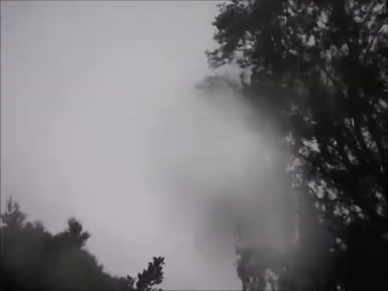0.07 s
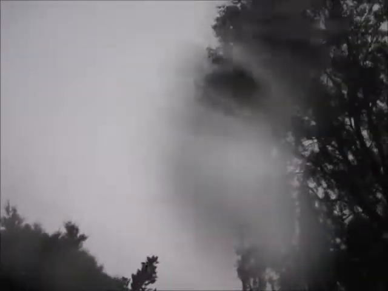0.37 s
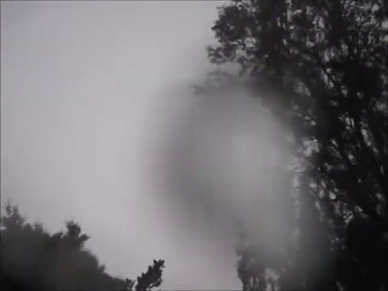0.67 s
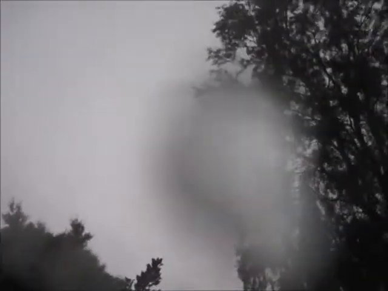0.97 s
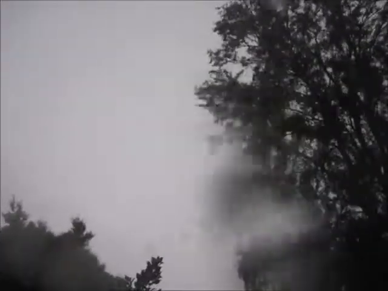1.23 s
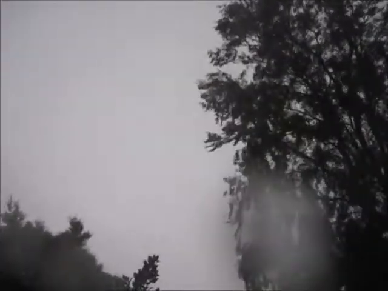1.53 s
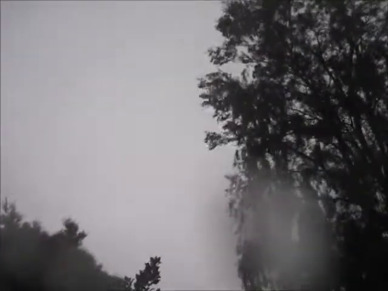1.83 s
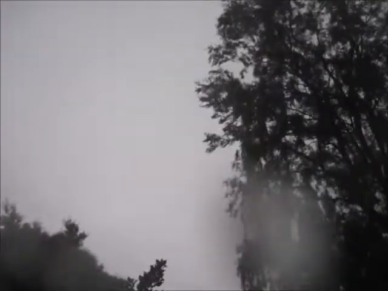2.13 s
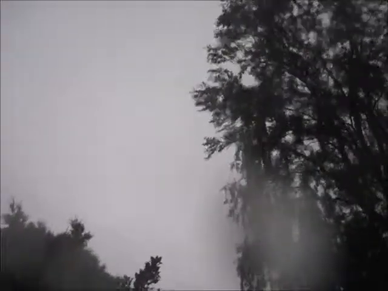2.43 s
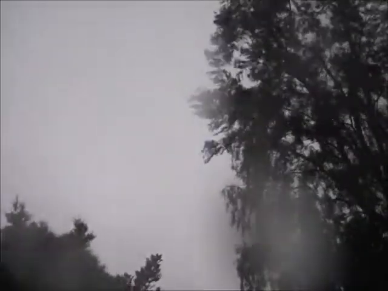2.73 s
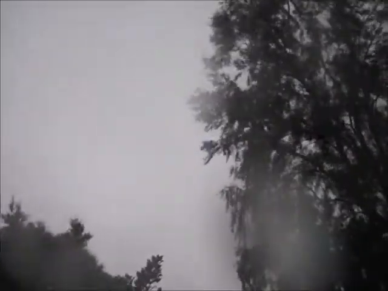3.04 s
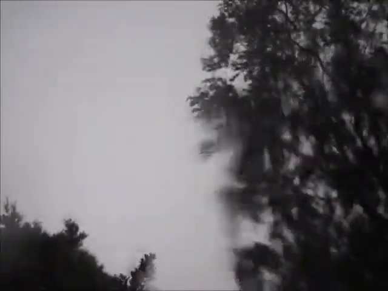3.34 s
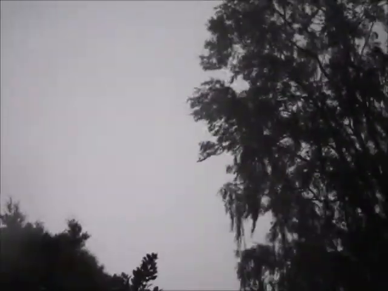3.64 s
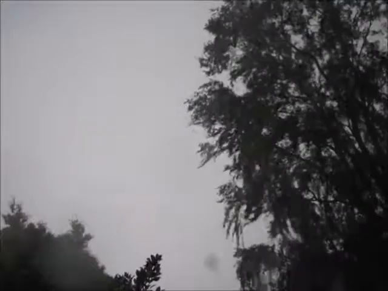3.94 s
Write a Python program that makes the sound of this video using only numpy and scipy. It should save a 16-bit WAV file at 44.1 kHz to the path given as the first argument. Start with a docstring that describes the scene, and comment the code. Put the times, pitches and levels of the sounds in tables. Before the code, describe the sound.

Heavy raindrops smack and tap right beside the microphone over a steady wash of rain.

```python
"""Heavy raindrops smack onto a camera held out in the rain, right beside its microphone.
Each drop is a splat, about a millisecond long, that makes the casing ring. Drops on wet spots plop,
and drops further off on the body give hollow knocks. Light taps and fine spray patter between them
over the steady wash of rain on trees. The hardest hits overload the microphone."""
import sys
import numpy as np
from scipy import signal
from scipy.fft import rfft, irfft
from scipy.io import wavfile
from scipy.ndimage import uniform_filter1d

SR = 44100
rng = np.random.default_rng(int(sys.argv[2]) if len(sys.argv) > 2 else 0)


def int16_out(signal):
    """Quantize to a 16-bit WAV file."""
    q = np.round(np.clip(np.atleast_2d(signal).T, -1, 1) * 32767)
    wavfile.write(sys.argv[1], SR, q.astype(np.int16))


N = 176400  # 4 seconds
HIT_TIME = np.arange(6000) / SR  # seconds since a drop landed

# big drops, with four parts from low to high (time [s], thud [dB], smack [dB], crack [dB], spray [dB])
HEAVY_DROPS = [(0.023, -33, -16.5, -23, -21.5), (0.0539, -32, -21.5, -27, -23.5),
               (0.2035, -21, -16.5, -19.5, -27), (0.2249, -38, -17, -18.5, -24),
               (0.2619, -37, -18.5, -19.5, -23), (0.2683, -28.5, -19.5, -21.5, -20),
               (0.3103, -49, -17, -42, -28), (0.327, -29, -27, -23.5, -34),
               (0.3453, -35, -25.5, -25.5, -29), (0.3607, -30, -39, -23, -28.5),
               (0.3913, -29.5, -17, -24.5, -28), (0.4087, -30, -45, -23.5, -26),
               (0.4378, -32.5, -34, -21.5, -26.5), (0.4776, -32.5, -19, -23, -34),
               (0.5055, -38, -24, -23, -30), (0.5205, -34, -24, -25, -51.0),
               (0.5502, -29, -32, -24.5, -27.5), (0.6153, -32.5, -19.5, -21, -22),
               (0.711, -38, -23, -26, -29), (0.845, -20.5, -13.5, -15, -18),
               (0.8814, -24.5, -15, -20, -19.5), (1.0153, -22.5, -12, -23, -15),
               (1.053, -30, -22, -19, -29), (1.091, -19.5, -14.5, -22.5, -23),
               (1.1364, -19, -21.0, -17.5, -20), (1.1409, -29.5, -35, -27, -35),
               (1.1666, -28.5, -28.5, -33, -35), (1.2401, -22, -24.5, -18.5, -25),
               (1.2776, -34, -17.5, -23.5, -29), (1.2853, -24, -18, -18, -13),
               (1.3581, -25, -12, -15.5, -18.5), (1.369, -33.5, -19, -43, -36),
               (1.6028, -29.5, -19.5, -20, -27), (1.6329, -35.0, -27.5, -31, -36),
               (1.6604, -29.5, -28, -28.5, -33), (1.719, -27, -16.5, -24.5, -23),
               (1.7907, -29, -26.5, -19, -21.5), (2.0823, -38.0, -29, -35.5, -27.5),
               (2.1791, -22.5, -16, -19, -25), (2.3568, -37, -24.5, -24, -26.5),
               (2.536, -23, -19.5, -23, -36), (2.5722, -37, -19, -27, -30), (2.6375, -21, -22.5, -43, -37),
               (2.7714, -44, -28, -27.5, -56), (2.8062, -45, -21, -31, -31), (2.8225, -29.5, -21, -38, -31),
               (2.8612, -46, -20.5, -28, -36), (3.0204, -33, -22.5, -24, -33),
               (3.1273, -13.5, -15.5, -17, -18), (3.1804, -17.5, -16.5, -22, -23.5),
               (3.2398, -20, -21, -28.0, -32), (3.2585, -22, -12, -18.5, -21),
               (3.2903, -20, -21.5, -24, -21.5), (3.3188, -37, -22, -24.5, -27),
               (3.3293, -28, -31, -31, -34), (3.3468, -27.5, -20, -21, -17.5),
               (3.4164, -19, -19.5, -19.5, -24.5), (3.579, -18, -26, -21, -26),
               (3.6373, -25.5, -13, -22.5, -21.5), (3.6456, -29, -22, -19.5, -25),
               (3.657, -28.5, -14.5, -28, -23), (3.68, -30, -14, -25, -36), (3.884, -17, -21.5, -18, -24),
               (3.916, -23, -14.5, -17.5, -17), (3.939, -32, -17, -23, -22),
               (3.9966, -25.5, -14.5, -21.5, -18.5)]
def heavy_drops():
    """Big drops hit the casing next to the microphone."""
    drops = np.array(HEAVY_DROPS)
    return strikes(drops[:, 0], drops[:, 1:])


# a splat's thud, smack, crack and spray (low edge [Hz], high edge [Hz], delay [s], fade [s], level [dB])
SPLAT_PARTS = [(482, 1255, 0.00038, 0.0013, -1), (1340, 2510, .0002, 0.0023, -3.5),
               (2980, 5250, 0.000047, 0.001, 0), (5870, 14700, 0.000023, 0.00017, -1)]
CLICK_DB = [-10, -3, -4.5, -3.5]  # the first touch, compared with the noise of each part
def strikes(times, levels_db):
    """Each drop pushes the casing, sets it ringing and splats in four short bursts of noise."""
    size, level_span = 1024, 220  # samples: a burst's length, and the span that sets its level
    t = HIT_TIME[:size]
    hz = np.maximum(np.arange(size // 2 + 1) * SR / size, 1)
    pitch = np.exp(0.12 * rng.standard_normal((len(times), 1)))  # drops differ in size, so in pitch
    centres_hz = np.array([np.sqrt(low * high) for low, high, *_ in SPLAT_PARTS])
    rise = HIT_TIME / 0.00026  # the push of the drop's weight peaks after 0.26 ms
    push = np.outer(gain(levels_db[:, 0] + 6.5), rise * np.exp(1 - rise))
    hits = casing_ring(centres_hz, levels_db) * (1 - np.exp(-rise)) - push
    for part, (low, high, delay, fade, part_db) in enumerate(SPLAT_PARTS):
        shape = np.exp(-t / fade) + gain(-19.5) * np.exp(-t / 0.002)  # splat, then scattering droplets
        noise = rfft(shape * rng.standard_normal((len(times), size))) / np.sqrt(np.sum(shape ** 2))
        force = (noise + gain(CLICK_DB[part])) * np.exp(-2j * np.pi * hz * delay)
        ratio = hz / (centres_hz[part] * pitch)
        off_centre = 1j * (ratio - 1 / ratio) * centres_hz[part] / (high - low)
        burst = irfft(force / (1 + np.sqrt(2) * off_centre + off_centre ** 2))  # keep this part's band
        strength = np.sqrt((burst ** 2).sum(1) / level_span)
        hits[:, :size] += burst * (gain(levels_db[:, part] + part_db) / strength)[:, None]
    out = np.zeros(N)
    for start, hit in zip(times, hits):
        add(out, start, hit)
    return out


# the casing's own tones (pitch [Hz], level [dB], time to fade by 60 dB [s])
CASING_TONES = [(303, -12, 0.029), (477.3, -5.5, 0.069), (599.3, -2, 0.075), (812.4, -7.5, 0.095),
                (1003, -7.5, 0.058), (1357, -11.5, 0.073), (1510, -21, 0.03), (1675, 4.5, 0.011),
                (1895, -8, 0.053), (1922, -7, 0.076), (2224, 2.5, 0.024), (2314, -2.5, 0.023),
                (3300, -26, 0.062)]
def casing_ring(centres_hz, levels_db, scatter_db=4):
    """The splat sets the casing's tones ringing; each landing spot mixes them differently."""
    hz, tone_db, ring_s = np.array(CASING_TONES).T
    drive_db = np.array([np.interp(np.log(hz), np.log(centres_hz), drop) for drop in levels_db])
    strength = gain(drive_db + tone_db + scatter_db * rng.standard_normal(drive_db.shape))
    phase = np.exp(2j * np.pi * rng.random(strength.shape))
    tones = np.exp(np.outer(2j * np.pi * hz - np.log(1000) / ring_s, HIT_TIME))
    return ((strength * phase) @ tones).imag


# drops on wet spots (time [s], pitch [Hz], level [dB], time to fade by 60 dB [s])
WET_PLOPS = [(0.55, 4740, -2, 0.005), (.5505, 606, -19, 0.052), (.7065, 1570, -12.5, 0.018),
             (.8446, 925, 7.5, 0.0049), (1.137, 571, -17, 0.089), (1.2407, 598, -13, 0.044),
             (1.6607, 1435, -7.5, 0.022), (1.6612, 987, -10.5, 0.023), (1.7912, 1100, -1, 0.0047),
             (2.1795, 650, -5, 0.011), (2.6372, 756, -4.5, 0.017), (2.9617, 1520, -5.5, 0.01),
             (3.1282, 712, -2.5, 0.02), (3.1283, 1230, 8, 0.0057), (3.1806, 556, -12, 0.044),
             (3.2596, 2850, -6, 0.012), (3.2593, 1860, 1.5, 0.012), (3.4165, 900, 1.5, 0.0044),
             (3.5795, 1750, -6.5, 0.018)]
def plops():
    """Drops that land on a wet spot plop or snap with a pitch of their own."""
    out = np.zeros(N)
    for start, hz, db, ring_s in WET_PLOPS:
        add(out, start, ping(hz, db, ring_s, attack_s=0.00042))
    return out


def shudder():
    """The hardest hit shakes the whole camera with one short, deep tone."""
    out = np.zeros(N)
    add(out, 3.129, ping(hz=43.3, db=-15.5, ring_s=0.061, attack_s=0.00094))
    return out


# light taps between the big drops (time [s], level [dB])
LIGHT_TAPS = [(0.0841, -42), (0.2779, -30), (0.29, -28.5), (0.3367, -34), (.402, -32), (.454, -30),
              (0.4942, -27.5), (0.6255, -30), (.745, -31), (0.771, -34), (0.7938, -36), (.807, -36),
              (0.8333, -27.5), (.895, -36), (0.9365, -40.5), (0.9751, -34), (1.0875, -31), (1.157, -35),
              (1.486, -35.5), (1.507, -38), (1.5814, -33.5), (1.816, -29.5), (1.8861, -36), (1.8983, -37.5),
              (2.093, -36), (2.1912, -34.5), (2.327, -31), (2.3973, -37.5), (2.4734, -34), (2.4802, -30.5),
              (2.4987, -35), (2.581, -31.5), (2.5992, -29), (2.606, -36), (2.634, -23.5), (2.6576, -34),
              (2.7337, -36), (2.7579, -38), (2.7965, -30), (2.8117, -29.5), (2.9394, -30), (3.0517, -29),
              (3.407, -32), (3.707, -31.5), (3.7299, -30.5)]
TAP_COLOUR_DB = np.array([-10, 0.5, -2, -6.5])  # added to thud, smack, crack, spray
def taps():
    """Medium drops strike the casing, all with the same bright colour."""
    times, db = np.array(LIGHT_TAPS).T
    return strikes(times, db[:, None] + TAP_COLOUR_DB)


# drops on the far side of the body (time [s], level [dB])
FAR_KNOCKS = [(0.28, -24), (0.302, -20), (.572, -25.5), (1.174, -20.5), (1.321, -22.5), (1.526, -28),
              (1.582, -26), (1.665, -26.5), (1.9415, -33.5), (2.023, -19.5), (2.36, -26.5), (2.6138, -22),
              (2.9116, -19.5), (3.072, -20.5), (3.217, -16), (3.392, -25.5), (3.473, -20), (3.513, -25),
              (3.548, -26.5), (3.692, -25), (3.7005, -20.5), (3.816, -25.5)]
# the hollow body's tones (pitch [Hz], level [dB], time to fade by 60 dB [s])
BODY_TONES = [(186.2, -14.5, 0.16), (307, -15.5, 0.13), (464, -6.5, 0.17), (472.4, 0, 0.052),
              (621, -19.5, 0.11), (790, -7, 0.076), (1034, -13, 0.055)]
def knocks(scatter_db=3, detune=0.025):
    """A faint tick, then a hollow ring that starts a little high and settles as the water spreads."""
    times = np.array(FAR_KNOCKS)[:, 0]
    out = strikes(times, np.tile(TAP_COLOUR_DB - 39, (len(times), 1)))  # the ticks
    # the landing spot shifts the pitch and level of the tones
    spots = rng.standard_normal((len(times), len(BODY_TONES) + 1))
    for (start, knock_db), (pitch_shift, *level_shifts) in zip(FAR_KNOCKS, spots):
        for (hz, tone_db, ring_s), level_shift in zip(BODY_TONES, level_shifts):
            pitch = hz * (1 + detune * pitch_shift)
            db = knock_db + tone_db - 0.5 + scatter_db * level_shift
            add(out, start, ping(pitch, db, ring_s, attack_s=0.00094, bend=0.18))
    return out


PATTER_COLOUR_DB = np.array([-2, 1.5, -3, -12])  # added to thud, smack, crack, spray
def patter(drops_per_s=120, base_db=-49.5):
    """Many small droplets strike the casing at random, a few of them larger."""
    when, chance = rng.random((int(drops_per_s * N / SR), 2)).T
    times = when * N / SR
    size_db = np.minimum(-3.7 * np.log(chance), 8.5)
    db = base_db + shower_db(times) + size_db
    return strikes(times, db[:, None] + PATTER_COLOUR_DB)


# tone colour of the finest spray (frequency [Hz], level [dB])
SPRAY_COLOUR = [(1200, -18), (3000, -2.5), (16000, 1)]
def spray(ticks_per_s=1500, base_db=-54, spread_db=14):
    """The finest droplets crackle on the microphone opening, louder when the shower swells."""
    when, smallness = rng.random((int(ticks_per_s * N / SR), 2)).T
    ticks = np.bincount((when * N).astype(int), gain(-spread_db * np.sqrt(smallness)), N)
    return unit(colour(ticks, SPRAY_COLOUR)) * gain(base_db + shower_db(np.arange(N) / SR))


# tone colour of the rain all around (frequency [Hz], level [dB])
WASH_COLOUR = [(30, 1), (90, -0.5), (130, -8.5), (380, -3), (500, 5.5), (700, -9.5), (1200, -3.5),
               (1850, -8.5), (2600, -7), (4200, -14), (5300, -11), (7000, -19), (12000, -23), (16000, -38)]
def wash(base_db=-43.5):
    """Rain on the trees and ground blends into a steady hiss."""
    hiss = unit(colour(rng.standard_normal(N), WASH_COLOUR))
    return hiss * gain(base_db + shower_db(np.arange(N) / SR))


# how hard it rains (time [s], level [dB])
SHOWER_STRENGTH = [(0, 2), (.4, 1.5), (1, 0.5), (1.5, 1.5), (1.95, 1), (2.35, -1), (2.8, 3.5), (3.3, -0.5),
                   (3.7, 2.5), (4, 2.5)]
def shower_db(times):
    """The shower swells and eases, taking the patter, spray and wash with it."""
    return np.interp(times, *np.array(SHOWER_STRENGTH).T)


def ping(hz, db, ring_s, attack_s, bend=0, settle_s=0.005):
    """One fading tone; with a bend, its pitch starts high and settles."""
    cycles = hz * (HIT_TIME + bend * settle_s * (1 - np.exp(-HIT_TIME / settle_s)))
    fade_in = 1 - np.exp(-HIT_TIME / attack_s)
    fade_out = np.exp(-np.log(1000) * HIT_TIME / ring_s)
    return gain(db) * np.sin(2 * np.pi * cycles) * fade_in * fade_out


def colour(sound, points):
    """Turn lows and highs up or down along a curve of (frequency [Hz], level [dB]) points."""
    hz, db = np.array(points).T
    size = 2 * N
    curve_db = np.interp(np.log(np.arange(N + 1) * SR / size + 1), np.log(hz), db)
    cepstrum = irfft(np.log(gain(curve_db)))
    cepstrum[1:N] *= 2  # folded so that the filter rings only after a hit, never before
    cepstrum[N + 1:] = 0
    return irfft(rfft(sound, size) * np.exp(rfft(cepstrum)))[:N]


def gain(db):
    """Turn decibels into a number to multiply by."""
    return 10 ** (np.asarray(db) / 20)


def unit(sound):
    """Scale a sound to an average (rms) level of 1."""
    return sound / np.sqrt(np.mean(sound ** 2))


def add(out, start_s, sound):
    """Mix a sound in at its start time."""
    first = max(int(start_s * SR), 0)
    out[first:first + len(sound)] += sound[:max(len(out) - first, 0)]


def scene():
    """Close drops over the steady rain, in one channel."""
    return (heavy_drops() + plops() + shudder() + taps() + knocks() + wash() + patter() + spray())[None]


# tone colour of the microphone opening (frequency [Hz], level [dB])
OPENING_COLOUR = [(30, -9.5), (350, -1.5), (480, -1.5), (1100, 0), (1850, 2.5), (2030, -5), (2300, -6.5),
                  (2650, -2), (3400, 1), (4200, -3.5), (5200, 3.5), (5900, 3), (7000, -3), (8000, -1.5),
                  (11000, -8), (16000, -13)]
def record(dry, notch_hz=6310, notch_width_hz=1200, top_hz=16200):
    """The opening colours the sound and cancels a narrow band; peaks overload; the very top is cut."""
    overloaded = np.clip(colour(dry[0], OPENING_COLOUR), -1, 1)
    notch = signal.iirnotch(notch_hz, notch_hz / notch_width_hz, fs=SR)
    top_cut = signal.ellip(8, .2, 90, top_hz, fs=SR, output="sos")
    return signal.sosfilt(top_cut, signal.lfilter(*notch, overloaded))[None]


dry = scene()
out = record(dry)
int16_out(out)
```